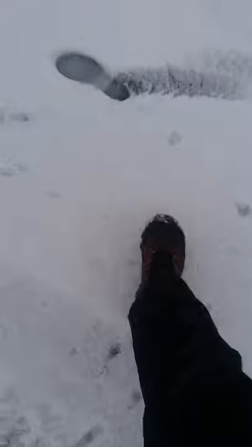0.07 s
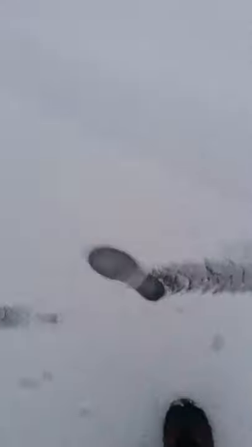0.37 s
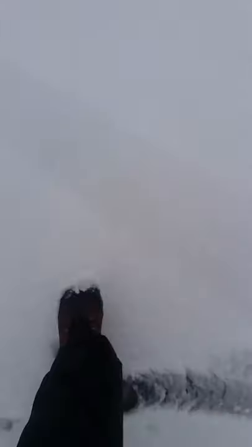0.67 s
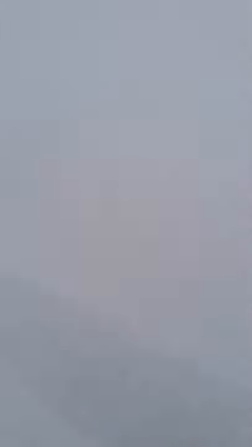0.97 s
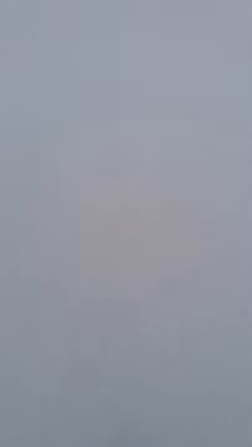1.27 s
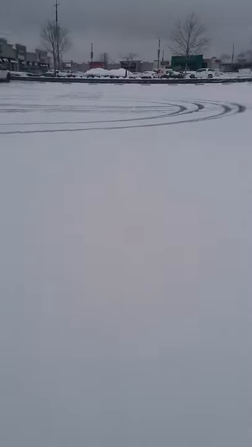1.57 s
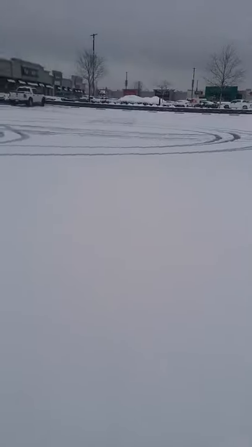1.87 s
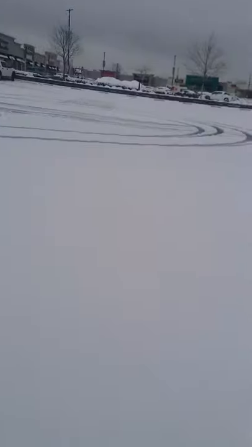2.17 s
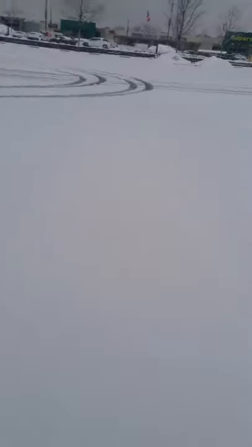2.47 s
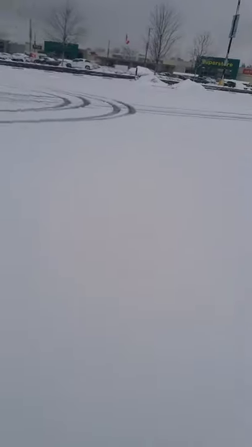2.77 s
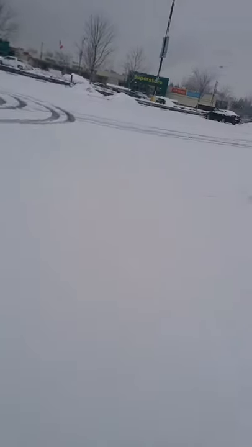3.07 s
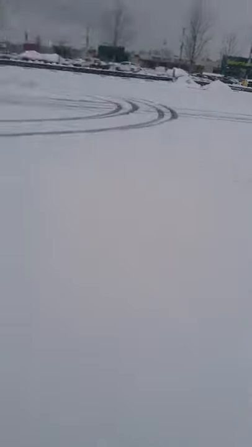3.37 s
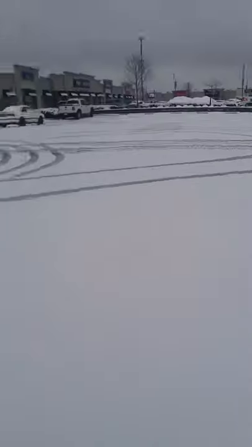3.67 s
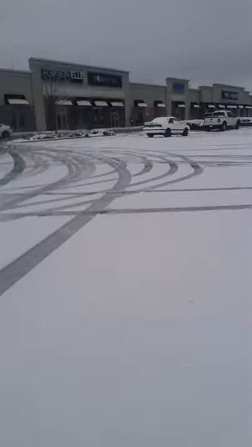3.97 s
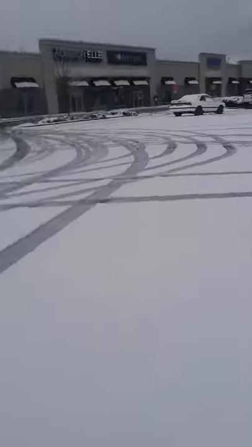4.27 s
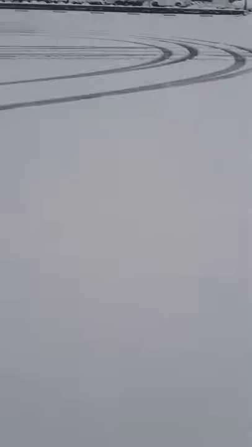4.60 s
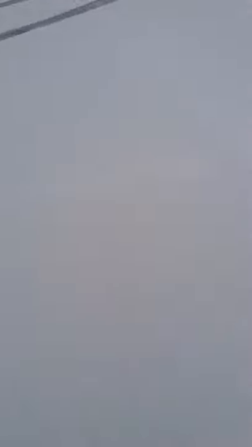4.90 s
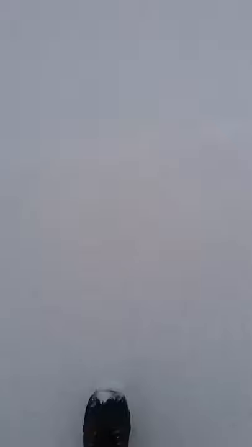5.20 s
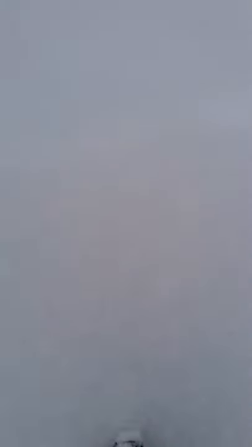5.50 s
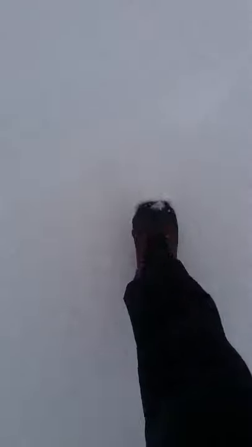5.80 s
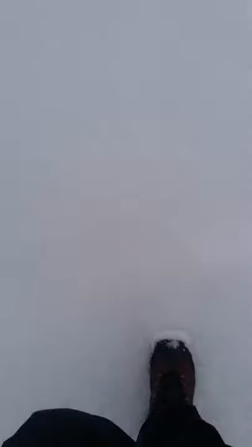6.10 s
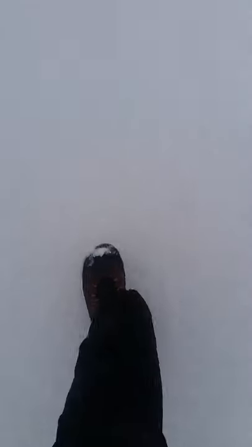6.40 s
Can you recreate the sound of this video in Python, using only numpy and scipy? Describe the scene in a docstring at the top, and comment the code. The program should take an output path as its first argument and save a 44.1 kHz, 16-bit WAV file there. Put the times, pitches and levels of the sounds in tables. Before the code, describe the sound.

Boots crunch softly through fresh snow on an open lot, about two steps a second, with trouser legs swishing and tiny crumbs of snow ticking. Something close to the handheld microphone gives a small hollow knock with most strides, and light wind and footfalls bump it now and then. Behind this, distant traffic rumbles and a far engine hum swells past the middle, then eases slightly.

```python
"""Footsteps in fresh snow on an open lot, about two a second, phone in hand.
Boots pack the snow in coarse grains and plough up powder; trouser legs swish by friction.
Something near the microphone knocks with most strides; light wind and footfalls bump it.
A far eight-cylinder engine swells and fades over traffic rumble, tyre roar and a faint whine."""
import sys
import numpy as np
from scipy import signal
from scipy.fft import rfft, irfft
from scipy.io import wavfile

SR = 44100
rng = np.random.default_rng(int(sys.argv[2]) if len(sys.argv) > 2 else 0)


def wrap_up_sound(samples):
    """Save the sound to the file named by the first command line argument, as 16-bit audio."""
    columns = np.atleast_2d(samples).T
    # keep every value between -1 and 1, then stretch to whole-number steps
    tamed = np.clip(columns, -1, 1)
    steps = np.round(tamed * 32767).astype(np.int16)
    wavfile.write(sys.argv[1], SR, steps)


N = 293265
TIME_S = np.arange(N) / SR
FREQ_HZ = np.arange(N // 2 + 1) * SR / N

# background spectra (frequency [Hz], relative level [dB])
AIR_SPECTRUM = [(1500, 2.5), (5000, -5), (10000, -12), (15500, -14)]
RUMBLE_SPECTRUM = [(25, -38), (40, -42), (53, 1.5), (70, -3), (120, 4), (150, -3.5), (195, 0), (270, -9.5),
                   (350, -16), (500, -23.5), (1000, -60)]
ROAR_SPECTRUM = [(150, -4), (350, -1), (550, 1), (950, -0.5), (1400, -7.5), (2200, -15), (4000, -25.5),
                 (8000, -26.5), (15500, -51)]
# light gusts (time [s], level [dB])
WIND_GUSTS = [(.97, -35), (1.32, -35), (1.95, -36), (2.6, -31.5), (3.48, -38), (4.42, -32), (4.88, -31.5),
              (5.34, -33), (5.65, -31), (6.0, -35), (6.4, -45)]
# far tyre roar (time [s], level [dB])
ROAR_LEVEL = [(.75, -40.5), (1.2, -44.5), (2.0, -45), (3.0, -43), (3.7, -42.5), (4.7, -40.5), (5.1, -41),
              (6.65, -41)]
# far engine (time [s], level [dB])
ENGINE_LEVEL = [(.55, -41.5), (1.3, -48), (2.0, -38), (2.8, -34.5), (3.1, -35), (3.45, -28.5), (3.9, -25.5),
                (4.4, -26.5), (4.8, -29.5), (5.1, -34.5), (5.45, -30), (6.65, -33.5)]
# engine slowing a little (time [s], firing rate [Hz])
FIRING_RATE = [(.5, 181), (2.5, 180.6), (4.4, 167), (6.65, 165)]
# uneven firing pattern (order [x cycle rate], relative level [dB])
ENGINE_ORDERS = [(4, -5.5), (5, -17), (6, -16.5), (7, -15), (8, -0.5), (9, -7), (10, -2.5), (11, -10),
                 (12, -3.5), (13, -11), (14, -13), (15, -10), (16, -18), (18, -22.5)]
# air and footfall bumps (time [s], peak [dB], pitch [Hz], T60 [s])
MIC_BUMPS = [(0.925, -18.5, 93.5, 0.049), (0.991, -21, 75, 0.075), (1.085, -25, 70, 0.038),
             (1.106, -17, 100.5, 0.11), (1.987, -15.5, 169, 0.018), (3.451, -23, 161, 0.027),
             (4.438, -18, 130, 0.033), (4.90, -16.5, 112, 0.06)]
# hollow knocks (time [s], main mode peak [dB], pitch [Hz], T60 [s],
# partner [dB re main], thud [dB re main])
HOLLOW_KNOCKS = [(0.6114, -22, 1110, 0.0061, 1.5, 0.5), (1.1434, -23.5, 607, 0.017, -2, 1),
                 (1.6937, -19.5, 965, 0.0095, -4.5, -9), (2.1893, -25, 950, 0.014, -6, -1),
                 (2.3016, -28.5, 1100, .006, -3, -4), (2.8715, -18.5, 1210, 0.0067, -18, -3.5),
                 (3.2423, -26, 860, 0.011, -9, -14), (3.288, -18.5, 696, 0.012, -15, -6),
                 (3.343, -27.5, 950, 0.0071, -4, -3), (3.9308, -18.5, 1020, 0.0083, -4.5, -7),
                 (5.1178, -20.5, 1000, 0.01, -4, -8), (5.5699, -16.5, 920, .007, -21, -16),
                 (6.182, -37, 405, 0.013, -16, 14)]
# snow crumbs (time [s], peak [dB], pitch [Hz])
CRUMB_TICKS = [(0.8278, -26, 4740), (1.317, -27, 4580), (1.8165, -24, 4500), (1.8237, -30, 6700),
               (1.857, -31, 5640), (2.161, -30.5, 4500), (3.129, -27, 6400), (4.534, -33, 4240),
               (5.178, -29, 3910), (5.3, -30, 6460), (5.313, -30, 6400), (5.8164, -32, 4700),
               (6.504, -33, 8300)]
# cloth and sole rubs (time [s], half length [s], centre [Hz], half width per filter pass [Hz], level [dB])
SHORT_RUBS = [(0.416, .2, 2420, 600, -49), (.95, .09, 2400, 800, -48.5), (0.764, .09, 12300, 900, -57.5),
              (1.108, 0.012, 9500, 3000, -51), (1.25, .088, 4440, 900, -49), (1.573, 0.14, 8350, 1300, -51),
              (1.71, 0.17, 4400, 700, -48.5), (1.79, .05, 11900, 600, -63), (1.797, 0.13, 8200, 503, -59),
              (2.65, .05, 2450, 700, -48), (2.7, 0.076, 8350, 1300, -52), (2.95, 0.069, 4280, 550, -54),
              (3.196, 0.069, 9400, 1000, -48.5), (3.524, 0.24, 6700, 300, -64),
              (3.673, .03, 4700, 2000, -40), (4.72, .008, 2750, 700, -39), (4.943, 0.096, 2440, 600, -43),
              (4.96, 0.099, 8800, 700, -56), (5.286, 0.17, 6550, 1500, -51.5),
              (5.434, 0.16, 8500, 1500, -55), (5.783, .035, 7000, 5000, -40), (6.04, .1, 2400, 600, -45.5),
              (6.083, 0.41, 8350, 1500, -58), (6.58, .085, 2400, 700, -53), (6.60, .12, 9350, 1600, -55)]
# snow and cloth spectra (frequency [Hz], relative level [dB])
PACKING_SPECTRUM = [(300, 4), (550, -12.5), (950, -3), (1700, -3), (2550, -3), (3600, -12.5), (7000, -47),
                    (14000, -40)]
POWDER_SPECTRUM = [(1000, -25), (2200, 11), (3300, 12), (5200, 10.5), (8000, 1.5), (10000, 2.5),
                   (12000, 0.5), (15500, -10.5)]
SLACK_SPECTRUM = [(1200, -9), (2500, -4), (3500, -3), (4600, 1), (5400, -0.5), (6300, -6.5), (8400, -34),
                  (15000, -11)]
TAUT_SPECTRUM = [(4000, -16.5), (5400, -1), (6300, 3), (7300, 0.5), (8400, -8.5), (9400, -9.5),
                 (11000, -16), (15000, -31)]
# clothes between steps (time [s], level [dB])
RUSTLE_LEVEL = [(.4, -49), (.7, -54.5), (1.25, -49), (1.8, -49.5), (2.35, -54), (2.85, -48.5), (3.4, -51),
                (4.0, -53), (4.5, -52), (5.1, -55.5), (5.45, -55.5), (6.4, -67)]
# boot ploughs, trouser leg swishes (time [s], rise [s], fall [s], cloth [dB], powder [dB])
BOOT_SCUFFS = [(.53, .05, 0.087, -50, -64), (.833, 0.024, 0.025, -39.5, -54),
               (1.39, .06, 0.047, -42, -45.5), (1.52, 0.063, .05, -39.5, -46),
               (2.06, 0.033, 0.096, -42.5, -50), (2.55, 0.04, 0.029, -51.5, -58),
               (2.95, 0.041, .04, -50, -53), (3.09, 0.039, 0.045, -42.5, -51),
               (3.675, 0.024, 0.05, -38.5, -46), (3.75, 0.051, 0.059, -43, -42),
               (4.28, .045, 0.047, -55, -48.5), (4.804, 0.055, 0.044, -41.5, -45),
               (5.22, 0.06, .07, -53, -49.5), (5.71, 0.067, 0.071, -41, -40.5),
               (5.782, 0.042, .042, -39.5, -37), (6.475, 0.031, 0.078, -61, -53)]
# sole takes weight, cloth pulls taut (time [s], half length [s],
# packing [dB], slack cloth [dB], taut cloth [dB], powder [dB])
BOOT_TREADS = [(.96, 0.081, -42.5, -43, -46.5, -57), (1.565, 0.13, -42.5, -53, -46, -55),
               (2.03, 0.11, -45, -43.5, -47.5, -48.5), (2.662, 0.13, -43, -47.5, -45.5, -52),
               (3.23, 0.11, -45, -61, -50, -50.5), (3.8, 0.14, -43, -46, -57, -52),
               (4.318, 0.32, -46.5, -50, -75, -62), (4.912, 0.1, -44, -50.5, -48.5, -49.5),
               (5.47, 0.13, -44, -58, -50.5, -48.5), (6.084, 0.2, -42.5, -53.5, -56, -57),
               (6.587, .08, -44.5, -60, -55, -60)]


def undb(db):
    """Decibels to gain."""
    return 10 ** (np.asarray(db) / 20)


def unit(x):
    """Scale to rms 1."""
    return x / np.std(x)


def curve(rows):
    """(time [s], value) table to a value per sample."""
    return np.interp(TIME_S, *np.transpose(rows))


def drift(rate_hz):
    """Slow random wander, spread near 1."""
    return 1.2 * np.interp(TIME_S * rate_hz, np.arange(4096), rng.standard_normal(4096))


def swell(peak_s, rise_s, fall_s, shape=1.37):
    """Gain rising to 1 and dying away; shape 1 is pointed, 2 a bell, higher squarer."""
    distance = abs(TIME_S - peak_s) / np.where(TIME_S < peak_s, rise_s, fall_s)
    return np.exp(-np.minimum(distance, 10) ** shape)


def colour(x, spectrum):
    """Filter by a spectrum table, to rms 1."""
    hz, db = np.transpose(spectrum)
    gain = undb(np.interp(np.log(FREQ_HZ + 1), np.log(hz), db))
    return unit(irfft(rfft(x) * gain * (FREQ_HZ > 15), N))


def grains(per_s, spread_db):
    """Tiny random fractures: many weak, a few strong."""
    hits = (rng.random(N) < per_s / SR) * rng.standard_normal(N)
    return unit(hits * undb(spread_db * np.minimum(rng.exponential(size=N), 4)))


def shimmer(x, depth_db, rate_hz, count=9):
    """Bands swell independently as the contact patch changes shape."""
    band_index = np.interp(np.log(FREQ_HZ + 1), np.log([900, 7000]), [0, count - 1])
    spectrum = rfft(x)
    bands = (irfft(spectrum * np.maximum(1 - abs(band_index - k), 0), N) for k in range(count))
    return unit(sum(band * undb(depth_db * drift(rate_hz)) for band in bands))


def ring(hz, t60_s, rise_s):
    """Damped mode, soft onset, peak 1."""
    t = np.arange(int(2 * t60_s * SR) + 64) / SR
    onset = 1 - np.exp(-(t / rise_s) ** 2)
    mode = np.sin(2 * np.pi * hz * t) * np.exp(-np.log(1000) * t / t60_s) * onset
    return mode / abs(mode).max()


def add(out, at_s, x):
    """Mix x into out."""
    start = int(at_s * SR)
    out[start:start + len(x)] += x[:N - start]


def air(level_db=-59):
    """Faint open-air hiss."""
    return colour(rng.standard_normal(N), AIR_SPECTRUM) * undb(level_db)


def rumble(steady_db=-33):
    """Low noise of traffic and moving air; gusts add in power."""
    gust_power = sum((undb(db) * swell(at_s, rise_s=0.13, fall_s=0.12)) ** 2 for at_s, db in WIND_GUSTS)
    return colour(rng.standard_normal(N), RUMBLE_SPECTRUM) * np.sqrt(undb(steady_db) ** 2 + gust_power)


def traffic(whine_hz=485, whine_db=-59.5):
    """Tyre roar and a thin whine from far roads."""
    roar = colour(rng.standard_normal(N), ROAR_SPECTRUM) * undb(curve(ROAR_LEVEL) + 0.5 * drift(10))
    phase = 2 * np.pi * np.cumsum(whine_hz + 1.68 * drift(5.5)) / SR
    whine = np.sqrt(2) * np.sin(phase) * undb(whine_db + 2 * drift(4))
    return roar + whine


def engine(cylinders=8, neutral_db=-27):
    """Only low exhaust orders carry this far; upper ones grow most in a swell, moving air flutters each."""
    cycle_hz = curve(FIRING_RATE) / cylinders * (1 + 0.003887 * drift(14))
    phase = 2 * np.pi * np.cumsum(cycle_hz) / SR
    level_db = curve(ENGINE_LEVEL)
    tilt_db_per_octave = 0.44 * (level_db - neutral_db)
    hum = np.zeros(N)
    for order, order_db in ENGINE_ORDERS:
        gain = undb(order_db + tilt_db_per_octave * np.log2(order / cylinders) + 2.2 * drift(12))
        hum += gain * np.sin(order * phase + 0.29 * drift(20) + 2 * np.pi * rng.random())
    return unit(hum) * undb(level_db)


def bumps():
    """Air and footfalls thump the microphone."""
    out = np.zeros(N)
    for at_s, db, hz, t60_s in MIC_BUMPS:
        add(out, at_s, undb(db) * ring(hz, t60_s, rise_s=0.004))
    return out


def knocks(partner_hz=1430, thud_hz=318):
    """Each jolt rings a short hollow mode, a brighter partner and a low thud."""
    out = np.zeros(N)
    for at_s, db, hz, t60_s, partner_db, thud_db in HOLLOW_KNOCKS:
        add(out, at_s, undb(db) * ring(hz, t60_s, rise_s=0.0007))
        add(out, at_s, undb(db + partner_db) * ring(partner_hz, t60_s, rise_s=0.0006))
        add(out, at_s, undb(db + thud_db) * ring(thud_hz, t60_s=0.012, rise_s=0.0015))
    return out


def crackle(re_rustle_db=-11):
    """Loose crystals snap as the walker moves."""
    snaps = colour(grains(per_s=35, spread_db=1), POWDER_SPECTRUM)
    return snaps * undb(curve(RUSTLE_LEVEL) + re_rustle_db)


def crumbs(burst_samples=256, decay_s=0.0009):
    """Snow crumbs snap: a noise burst through one mode each."""
    out = np.zeros(N)
    for at_s, db, hz in CRUMB_TICKS:
        burst = rng.standard_normal(burst_samples) * np.exp(-TIME_S[:burst_samples] / decay_s)
        tick = np.convolve(burst, ring(hz, t60_s=0.002, rise_s=0.00005))
        add(out, at_s, tick / abs(tick).max() * undb(db))
    return out


def rubs():
    """Cloth and sole slide briefly: friction grains through one resonance."""
    out = np.zeros(N)
    friction = grains(per_s=13000, spread_db=0.8)
    for at_s, half_s, hz, half_width_hz, db in SHORT_RUBS:
        near = abs(TIME_S - at_s) < 2 * half_s
        b, a = signal.iirpeak(hz, hz / (2 * half_width_hz), fs=SR)
        hiss = unit(signal.lfilter(b, a, signal.lfilter(b, a, friction[near])))
        envelope = np.exp(-2 * ((TIME_S[near] - at_s) / half_s) ** 2)
        out[near] += hiss * undb(db) * envelope
    return out


def gait(creep_db=-49):
    """Gains (packing, slack, taut, powder): rustle, scuffs and treads add in power."""
    rustle_db = curve(RUSTLE_LEVEL)
    # snow creeps under the standing boot
    rest_db = [np.full(N, creep_db), rustle_db, rustle_db - 8.5, rustle_db - 4.5]
    power = undb(rest_db) ** 2
    for at_s, rise_s, fall_s, cloth_db, powder_db in BOOT_SCUFFS:
        levels_db = [cloth_db - 4, cloth_db, cloth_db - 7, powder_db]
        power += np.outer(undb(levels_db) ** 2, swell(at_s, rise_s, fall_s, shape=2.6) ** 2)
    for at_s, half_s, *levels_db in BOOT_TREADS:
        power += np.outer(undb(levels_db) ** 2, swell(at_s, half_s, half_s) ** 2)
    return np.sqrt(power)


def steps():
    """Snow packs coarsely; cloth rubs finely, brighter when taut; kicked powder sprays treble."""
    packing_gain, slack_gain, taut_gain, powder_gain = gait()
    packing = colour(grains(per_s=5000, spread_db=-0.5), PACKING_SPECTRUM)
    packing = shimmer(packing, depth_db=2.16, rate_hz=8.8)
    slack = colour(grains(per_s=16000, spread_db=3.6), SLACK_SPECTRUM)
    slack = shimmer(slack, depth_db=2.5, rate_hz=7)
    taut = colour(grains(per_s=16000, spread_db=4.0), TAUT_SPECTRUM)
    powder = colour(grains(per_s=9000, spread_db=2.5), POWDER_SPECTRUM) * undb(2.7 * drift(90))
    return packing * packing_gain + slack * slack_gain + taut * taut_gain + powder * powder_gain


def scene():
    """Open air over snow: mono, no echoes."""
    hiss = air()
    walker = steps() + rubs() + crackle() + crumbs() + knocks() + bumps()
    distance = engine() + rumble() + traffic()
    return (hiss + distance + walker)[None]


def record(dry, low_hz=44, top_hz=15600, silence_s=0.33, fade_s=0.36):
    """Phone: bass cut, fade-in after a short silence, top cut."""
    highpass = signal.butter(4, low_hz, "high", fs=SR, output="sos")
    lowpass = signal.ellip(10, 0.2, 80, top_hz, fs=SR, output="sos")
    fade = np.clip((TIME_S - silence_s) / fade_s, 0, 1) ** 0.82
    return signal.sosfilt(lowpass, signal.sosfilt(highpass, dry) * fade)


dry = scene()
out = record(dry)
wrap_up_sound(out)
```